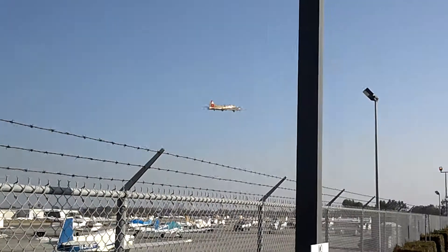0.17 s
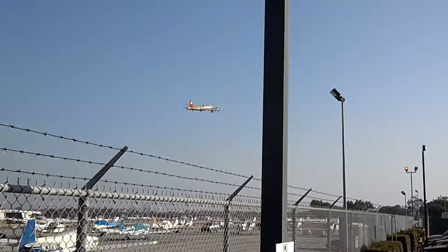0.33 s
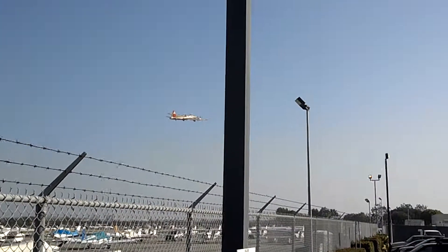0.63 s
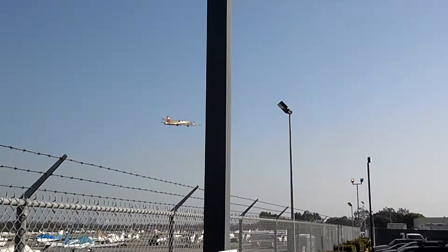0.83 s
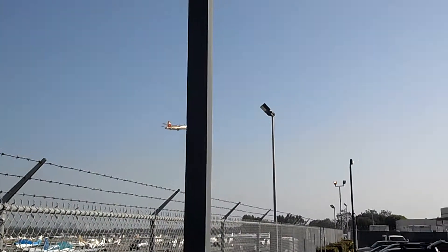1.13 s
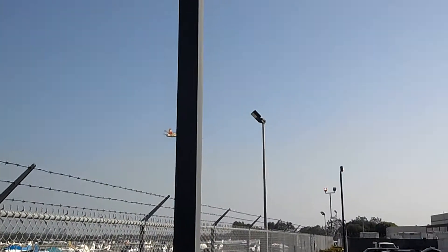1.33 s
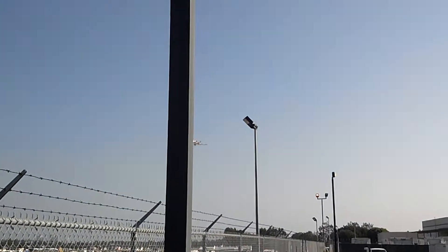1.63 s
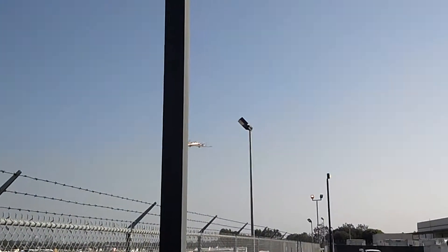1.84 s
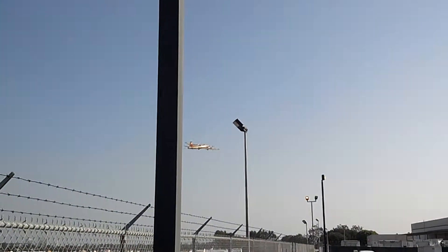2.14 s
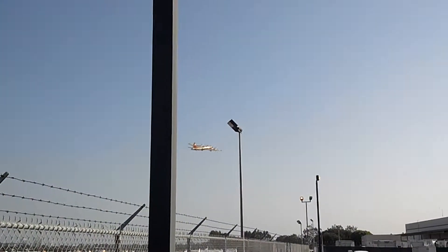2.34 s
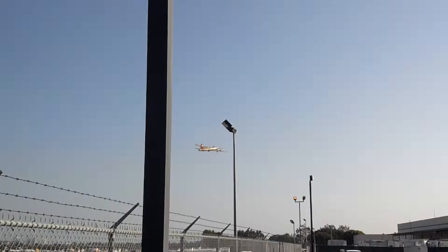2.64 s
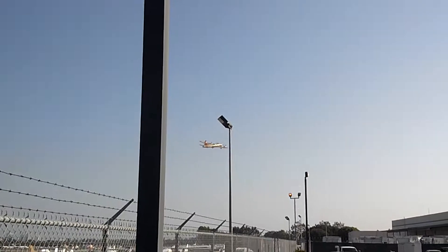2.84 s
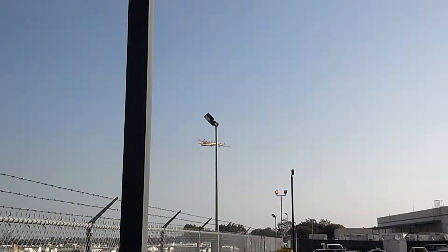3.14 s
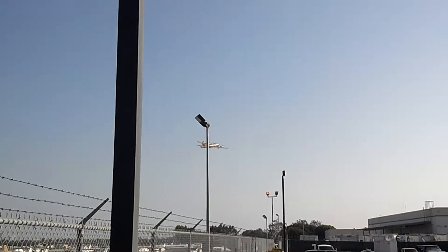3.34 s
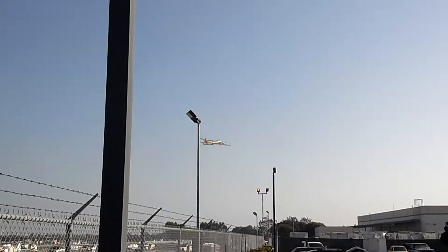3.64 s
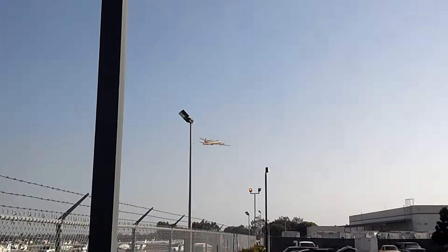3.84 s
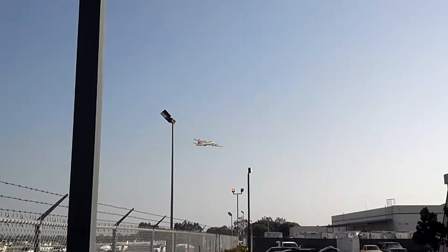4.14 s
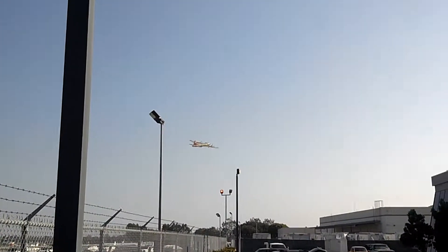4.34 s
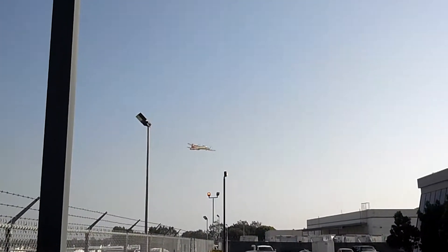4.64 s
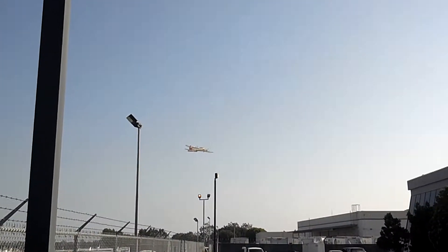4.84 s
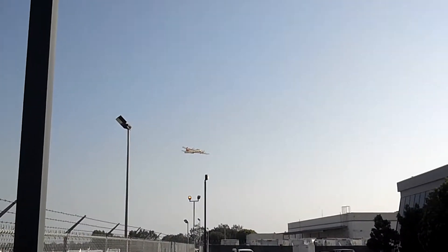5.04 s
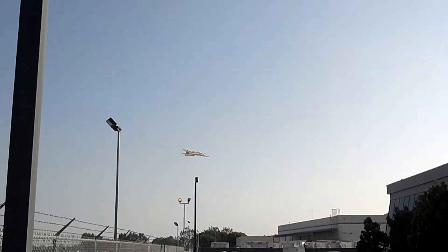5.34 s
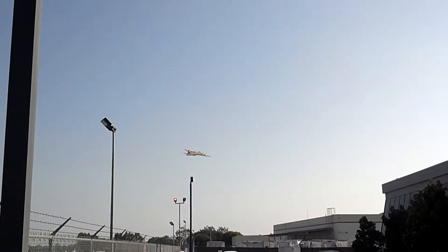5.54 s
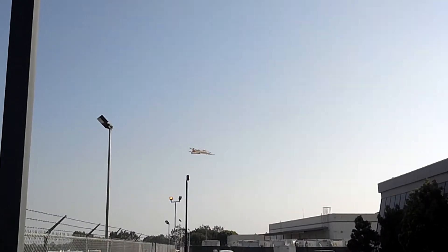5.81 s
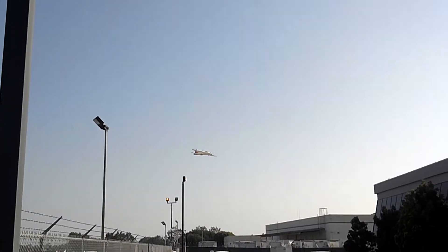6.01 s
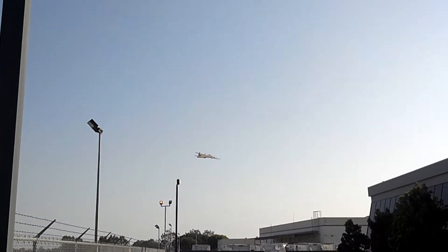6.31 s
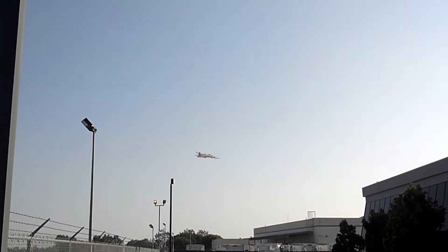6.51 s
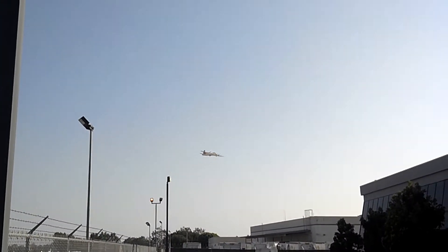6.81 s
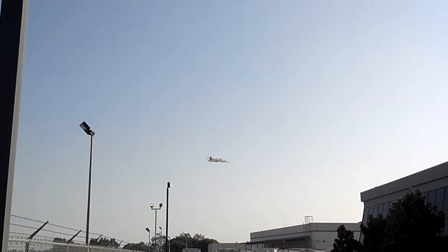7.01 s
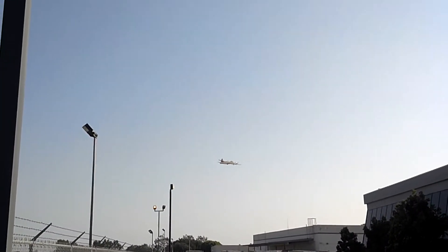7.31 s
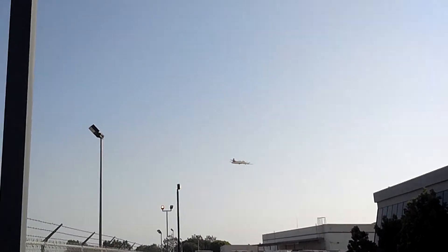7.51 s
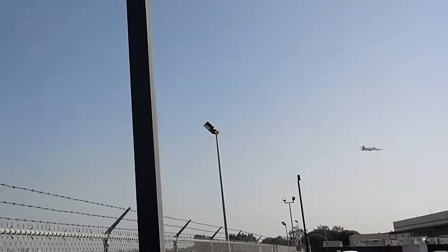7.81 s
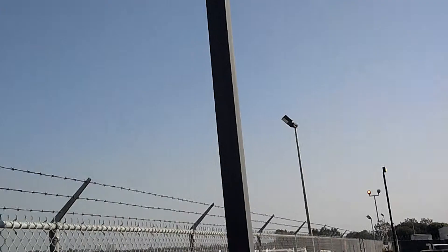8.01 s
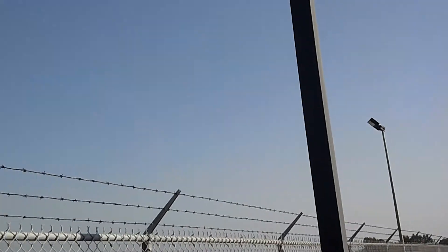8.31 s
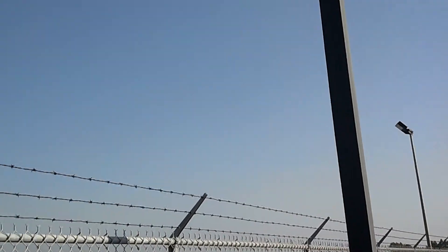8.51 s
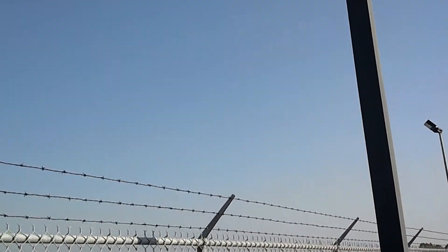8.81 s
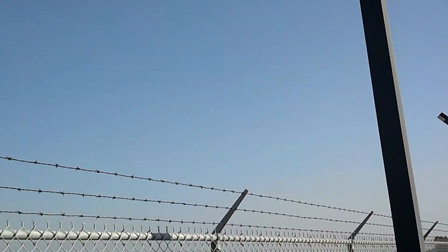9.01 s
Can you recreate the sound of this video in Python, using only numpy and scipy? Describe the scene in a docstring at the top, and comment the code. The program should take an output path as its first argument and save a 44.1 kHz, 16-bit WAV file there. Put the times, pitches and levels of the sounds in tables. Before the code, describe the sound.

A large four-engined piston aircraft, already airborne at some distance, climbs away past an airfield fence for about nine seconds. From the start its low drone and grainy mid-range roar are continuous, pulsed by rapid uneven firing, with tones beating slowly. Hard exhaust barks stand out around 0.4-0.5, 1.6-1.9, 2.5 and 3.5-3.8 seconds, with another near 5.4. The rasp shifts in colour and the treble gradually dulls. A gentle breeze rumbles in both channels of a hand-held camera microphone. A sharp wind thump comes at 6.0, then dry ticks and faint rubbing at the grip from 6.2 to 7.4. Strong buffets from 7.4 to 7.8 briefly pull the level down. Near 7.8 the camera swings aside and the roar changes colour; two more barks come near 8.3, a gust near 8.7, and the drone continues to the end over faint hiss.

```python
"""A four-engined piston aircraft climbs away past an airfield fence, heard by a hand-held camera in a breeze.
From the start, crank and propeller tones drone inside noise pulsed by nine-cylinder firing; hard barks ring
as damped sines, moving air makes the colour drift, and noise eddies buffet two close capsules over a faint hiss.
Ticks and rubbing at the grip gather after 6 s; the hardest gusts, at 6 s and from 7.4 s, pull the gain down.
Near 7.8 s the camera swings aside and the colour shifts; a delayed difference of capsules forms each channel."""
import sys
import numpy as np
from scipy import signal
from scipy.fft import rfft, irfft
from scipy.io import wavfile
from scipy.ndimage import uniform_filter1d

SR = 44100
rng = np.random.default_rng(int(sys.argv[2]) if len(sys.argv) > 2 else 0)


def store_wav(level_fs):
    """Save 16-bit WAV to argv[1]."""
    pcm = np.round(np.clip(np.atleast_2d(level_fs), -1, 1) * 32767)
    wavfile.write(sys.argv[1], SR, pcm.T.astype(np.int16))


N = 403956
T = np.arange(N) / SR  # time [s]

# All levels are relative: later stages add their own gains.
# Capsule self-noise spectrum above 500 Hz: f/Hz, level/dB
HISS_SPECTRUM = [(3000, 10), (8000, -6), (11000, -7.5), (15500, 0.5)]
HISS_DB = -72
# Breeze strength: t/s, level/dB
BREEZE = [(0, -39), (1.4, -32), (2.7, -41.5), (3.5, -32), (4.6, -42.5), (5.5, -35), (6.7, -30.5),
          (7.4, -26), (7.95, -33), (8.35, -28), (8.5, -32), (8.9, -25.5), (9.16, -29)]
# Strongest gusts: t/s, length/s, level/dB, side (1 left capsule, -1 right), top of the rumble f/Hz
GUSTS = [(.065, 0.049, -34, -0.32, 330), (1.58, 0.1, -29, .11, 260), (2.05, 0.19, -26, 0.18, 274),
         (2.298, 0.057, -29.5, -.2, 220), (5.6, 0.059, -33.5, .47, 250), (5.83, 0.17, -29.5, -0.19, 220),
         (6.002, .014, -12.5, -1, 170), (6.53, .046, -26, 1, 200), (6.76, 0.088, -25, .5, 230),
         (7.189, 0.092, -23.5, -.44, 280), (7.398, 0.055, -17.5, -0.42, 332),
         (7.436, 0.073, -13, 0.32, 546), (7.626, 0.011, -21.5, -0.87, 620),
         (7.668, 0.045, -16.5, -1.2, 376), (7.735, .04, -15, -1, 420), (7.822, .03, -18.5, -0.92, 400),
         (8.29, 0.048, -32, -.25, 259), (8.36, 0.035, -26, 0.7, 283), (8.44, 0.11, -26, 0.58, 170),
         (8.688, .028, -32, -0.37, 430), (8.736, 0.029, -17.5, -0.67, 430)]
# Spectrum of wind eddies at a capsule: f/Hz, level/dB
BUFFET = [(25, -29.5), (60, -5.5), (110, 7), (170, -1), (300, -3), (700, -14.5), (1500, -36.5), (4000, -51)]
BUILD_DB_PER_S = 24.5  # a gust builds up and breaks off
# Ticks on the camera body: t/s, level/dB, colour f/Hz
TICKS = [(1.2569, -55, 9000), (6.255, -47, 15500), (6.302, -37, 14560), (6.3995, -32, 13500),
         (6.414, -25.5, 14000), (6.4925, -36.5, 5500), (6.5838, -53, 14740), (6.7125, -42, 15200),
         (6.784, -31.5, 13500), (7.0716, -51, 12500), (7.363, -43, 13420)]
# Rubbing at the grip: t/s, length/s, level/dB
RUSTLES = [(0.06, 0.081, -59), (0.185, 0.15, -50), (0.69, 0.11, -66), (5.598, 1.65, -61),
           (6.23, 0.072, -52), (6.29, .02, -45), (6.393, 0.045, -45), (8.576, 0.25, -56)]
# Spectrum of the rubbing: f/Hz, level/dB
RUB_SPECTRUM = [(2500, -31), (6000, -2.5), (10000, -12), (12000, -5.5), (15500, 1.5)]
# Hardest exhaust barks: t/s, level/dB, pipe f/Hz
POPS = [(.423, -15.5, 480), (.447, -10, 453), (0.512, -15.5, 1180), (0.537, -6, 473), (1.628, -18, 970),
        (1.627, -12, 520), (1.712, -10, 467), (1.72, -14, 1030), (1.757, -12.5, 960), (1.776, -15, 1000),
        (1.777, -12, 1390), (1.81, -12, 960), (1.861, -12.5, 947), (2.473, -18, 910), (2.556, -14.5, 957),
        (2.588, -11.5, 1283), (3.543, -17, 1340), (3.656, -16, 1265), (3.75, -19, 1390), (5.383, -16, 1326),
        (8.29, -13, 393), (8.336, -18, 1460)]
# Engine cycle rate as heard, two crank turns a cycle: t/s, f/Hz
CYCLE_RATE = [(0, 17.45), (1.5, 17.36), (3.5, 17.27), (4.5, 17.22), (6, 17.3), (9.16, 17.29)]
# Engines, near ones leading: share off the common speed, level/dB
ENGINES = [(0, -2.5), (-.0025, -8), (.0012, -9), (.004, -6.5)]
# Crank tones: multiple of the cycle rate (nine is the firing rate), level/dB
ORDERS_DB = [(4, -28), (5, -19.5), (6, -29.5), (8, -29.5), (11, -27.5), (13, -34), (15, -27.5), (16, -30),
             (17, -24.5), (18, -27), (21, -29.5), (23, -24), (24, -26), (25, -28.5), (26, -31), (28, -33),
             (30, -28), (31, -32.5), (33, -31.5)]
# Multiples of the cycle rate carried by the strongest tones
LEADING_ORDERS = [7, 9, 14, 22]
# Strongest tones as the engines beat: t/s, level/dB of multiples 7, 9, 14 and 22
BEATING = [(0, -28, -29, -14.5, -25), (.23, -30, -36, -28, -26), (.45, -46, -16, -40, -20),
           (.95, -12, -13.5, -34, -15.5), (1.5, -17, -18, -10.5, -16.5), (2.05, -24, -14, -30, -23),
           (2.37, -18, -19.5, -32, -22), (2.6, -28, -13, -22, -20.5), (3.1, -26, -16.5, -27, -20),
           (3.6, -25.5, -19.5, -34, -27.5), (4.18, -16.5, -13.5, -26, -27), (4.37, -22, -29, -31, -24),
           (4.5, -18, -14.5, -29, -20.5), (4.9, -26, -21.5, -26.5, -18), (5.4, -27.5, -20, -23.5, -29),
           (5.69, -34, -37, -23.5, -24), (5.9, -25, -15, -23, -23.5), (6.2, -21, -26, -26, -19.5),
           (6.55, -26, -19.5, -24, -19), (7.001, -30, -28, -23, -19.5), (7.299, -40, -16.5, -19, -30.5),
           (8, -28, -36, -23, -23), (8.401, -29, -20, -19, -30.5), (9.16, -30.5, -23, -25, -24.5)]
BLADE_ORDER = 27 / 8  # blade passings per engine cycle
# Blade-passing tone and its overtones: level/dB
BLADES_DB = [-22.5, -30.5, -38, -43, -32, -28]
# Exhaust puffs in firing order: level/dB
CYLINDERS_DB = [-1, -2.5, -10, -8, 2.5, 0.5, -3, -15.5, -13]
# Flyby: t/s, level/dB, centre of the rasp f/Hz, rasp over the roar level/dB, treble over the roar level/dB
FLYBY = [(0, -25, 1270, 1, 2), (.09, -25, 1240, 2.5, 2), (.17, -29, 1350, 3.5, 2),
         (.55, -26, 1140, 4.5, 6.5), (1.15, -29.5, 1096, 6.5, 3.5), (1.45, -29, 1010, 1.5, 3),
         (1.8, -27.5, 1100, 9, 4.5), (2.2, -29, 1000, 3.5, 1), (2.57, -26.5, 1200, 5, -2),
         (3.2, -26, 1090, 4.5, -1), (3.72, -26, 1265, 6, 3.5), (4.1, -28, 1310, 3, 3),
         (4.5, -26.5, 1310, 3, 3), (4.85, -25.5, 1550, 5.5, 5), (5.1, -26.5, 1400, 3.5, 3.5),
         (5.4, -27, 1330, 1.5, -2), (5.9, -27, 1310, 4, -2.5), (6.45, -26, 1370, -4, -4),
         (6.7, -28.5, 1350, 1, -2.5), (7, -27.5, 1350, 2, -2.5), (7.25, -26, 1480, 4.5, 2),
         (7.45, -27, 1560, 6, -0.5), (7.7, -26.5, 1380, 2, -6), (7.92, -26.5, 1350, -0.5, 0),
         (8.3, -27, 1400, 0, -3.5), (8.6, -26.5, 1300, -2, -7.5), (8.8, -27.5, 1220, -4, -8.5),
         (9.16, -23, 1380, -3, -12.5)]
RASP_OCTAVES, TREBLE_HZ = 0.32, 2480  # width of the rasp; where the treble begins
# Spectrum of the roar: f/Hz, level/dB
ROAR = [(25, -27.5), (60, -20), (140, -1.5), (230, -9), (390, -13.5), (620, -19.5), (1300, -26.5),
        (2000, -27), (3500, -37.5), (5500, -52.5), (8000, -74.5), (16000, -96)]
# Exhaust pipe resonances: f/Hz, width/Hz, level/dB
PIPES = [(364, 54, 2.5), (580, 21, 1), (888, 112, 3.5), (1335, 112, 5.5), (1605, 45, 4), (1902, 24, 3)]
# Colour change in flying away: f/Hz, slope/(dB per s)
RECEDING = [(130, 0.27), (290, 0.14), (550, -0.43), (970, 0), (1340, 0.33), (1900, 0.5), (4000, 0),
            (7500, -1.9)]
SWING_S, SWING_LENGTH_S = 7.76, 0.76  # middle and length of the camera's swing off the aircraft
# Colour change once turned aside: f/Hz, level/dB
SWUNG = [(130, -6), (290, 6), (550, -0.5), (970, 2.5), (1900, 3), (4000, 6.5)]
# How far the low drone outweighs the low-mid roar: t/s, level/dB
DRONE_TILT = [(0, -19.5), (.3, -3.5), (.6, 2.5), (1.15, -4), (1.8, -5), (2.3, -7.5), (2.7, -7), (4.0, 1),
              (4.35, -4.5), (4.6, -8), (5.9, 5), (6.6, 4.5), (9.16, -6)]
# Weight of that tilt across the spectrum: f/Hz, share
TILT_SHARE = [(60, 0.07), (140, 0.15), (290, -0.034), (560, -0.26), (850, 0.041)]
BODY_HZ, BODY_OCTAVES = 537, 0.16  # centre and width of the low-mid band
# Low-mid band: t/s, level/dB
BODY = [(0, -2.5), (.3, 6.5), (.8, 3.5), (1.1, 1.5), (1.5, 6), (2.1, 7.5), (2.5, 0.5), (2.9, -2.5),
        (3.2, 4), (3.65, -4), (4.5, -4.5), (5.2, -4.5), (6.4, 1), (7.1, 4), (8, 2), (9.16, -2)]
# Likeness of the roar at the two capsules: f/Hz, correlation
ALIKE = [(100, 0.98), (350, 0.96), (700, 0.93), (1200, 0.69), (2500, 0.51), (4000, 0.73), (7000, 0.77)]
# Phase by which the left capsule leads: f/Hz, phase/rad
LEAD = [(80, 0), (200, -0.13), (330, 0.14), (500, 0.33), (700, -0.37), (1000, 0.84), (2000, 2), (3500, 5),
        (5000, 7.5), (7000, 18)]
# Left capsule over the right: f/Hz, level/dB
LEFT_DB = [(100, 1.5), (300, 2), (500, 5), (800, 3), (1200, -5.5), (2000, 5), (3500, 4), (6000, 6.5)]
CROSS_DELAY, EDGE_HZ = 16, 15800  # delay between opposed capsules [samples]; upper band edge
LIMIT_DB, LIMIT_SHARE, SENSE_S, RECOVER_DB_PER_S = -20, 0.65, 0.01, 7.5  # gain control


def gain_of(db):
    """Logarithmic level: decibels to amplitude ratio."""
    return 10 ** (np.asarray(db) / 20)


def evened(x):
    """Normalisation: scales to unit rms."""
    return x / np.sqrt(np.mean(x ** 2) + 1e-20)


def read(points, hz):
    """Interpolation on a logarithmic frequency axis."""
    f, value = np.transpose(points)
    return np.interp(np.log(hz + 1), np.log(f + 1), value)


def course(points, t):
    """Linear interpolation in time."""
    return np.interp(t, *np.transpose(points))


def spectra(x):
    """Short-time Fourier analysis: frequencies, times and spectra."""
    return signal.stft(x, SR, nperseg=1024, noverlap=768)


def sound(z):
    """Fourier synthesis by overlap-add of short-time spectra."""
    return signal.istft(z, SR, nperseg=1024, noverlap=768)[1][..., :N]


def coloured(points, channels):
    """Spectral shaping: white noise weighted by frequency, at unit rms."""
    gain = gain_of(read(points, np.fft.rfftfreq(N, 1 / SR)))
    return evened(irfft(rfft(rng.standard_normal((channels, N))) * gain, N))


def drift(t, hz):
    """Slow fluctuation at unit rms: random-phase sines up to hz, the slower the stronger."""
    rates = hz * np.geomspace(.05, 1, 16)
    return evened(sum(np.sin(2 * np.pi * (f * t + rng.random())) / np.sqrt(f) for f in rates))


def smoothed(shape, bins, frames):
    """Random field correlated over neighbouring frequencies and times, at unit rms."""
    across = uniform_filter1d(rng.standard_normal(shape), bins, axis=0)
    return evened(uniform_filter1d(across, frames, axis=1))


def octave_bump(hz, centre, octaves):
    """Resonance bell: a Gaussian in log frequency."""
    return np.exp(-.5 * (np.log2((hz + 1) / centre) / octaves) ** 2)


def add(mix, s, part):
    """Superposition: mixes a short sound in at time s."""
    place = mix[:, round(s * SR):][:, :part.shape[1]]
    place += part[:, :place.shape[1]]


def excerpt(x, s, length):
    """Windowing in time: the stretch of x that starts at s."""
    return x[:, round(s * SR):][:, :round(length * SR)]


def hiss(rise_db_per_s=1.13):
    """Capsule self-noise: a faint, independent treble floor that creeps up with time."""
    return coloured([(500, -55.5)] + HISS_SPECTRUM, channels=2) * gain_of(HISS_DB + rise_db_per_s * T)


def wind(lumpy_db=7.0, gust_lumpy_db=3.0, lump_s=0.012):
    """Turbulent pressure: eddies unrelated left and right form a lumpy breeze and separate gusts."""
    lumps = uniform_filter1d(rng.standard_normal((2, N)), round(lump_s * SR))
    eddies = coloured(BUFFET, channels=2) * evened(gain_of(gust_lumpy_db * evened(lumps)))
    breeze = coloured(BUFFET, channels=2) * evened(gain_of(lumpy_db * evened(lumps[::-1])))
    out = signal.lfilter(*signal.butter(2, 260, fs=SR), breeze) * gain_of(course(BREEZE, T))
    for s, length, db, side, reach_hz in GUSTS:
        band = signal.butter(2, [0.31 * reach_hz, reach_hz], "band", fs=SR)
        gust = signal.lfilter(*band, excerpt(eddies, s, length))
        size = gust.shape[1]
        gust = gust * signal.windows.tukey(size, .25) * gain_of(BUILD_DB_PER_S * T[:size])
        gust = np.array([evened(channel) for channel in gust])
        side = np.clip(side, -1, 1)
        balance = np.sqrt([[1 + side], [1 - side]])
        add(out, s, gain_of(db) * balance * gust)
    return out


def handling(tick_s=0.00092, grain_db=2.0, tick_db=4, body=0.36, far=0.44):
    """Structure-borne sound: ticks and grainy rubbing carried through the case to both capsules."""
    out, t = np.zeros((2, N)), np.arange(600) / SR
    grain = evened(gain_of(grain_db * evened(uniform_filter1d(rng.standard_normal(N), 130))))
    rub = coloured(RUB_SPECTRUM, channels=2) * grain
    broad = signal.butter(2, 2500, "high", fs=SR)
    for (s, db, hz), burst in zip(TICKS, rng.standard_normal((len(TICKS), len(t)))):
        band = signal.butter(2, [0.9 * hz, min(1.5 * hz, .45 * SR)], "band", fs=SR)
        snap = np.outer([1, far], burst * np.exp(-t / tick_s))  # nearer the left capsule
        # a broad snap under the ring
        tick = signal.lfilter(*band, snap) + body * signal.lfilter(*broad, snap)
        add(out, s, gain_of(db + tick_db) * tick / abs(tick).max())
    for s, length, db in RUSTLES:
        rustle = excerpt(rub, s, length)
        add(out, s, gain_of(db) * rustle * signal.windows.tukey(rustle.shape[1], .95))
    return out


def pops(t60=0.048, rise_s=.0008, left_db=-4.5, right_db=-8.5):
    """Damped resonance: single hard firings each ring one exhaust pipe briefly."""
    out, t = np.zeros((2, N)), np.arange(2000) / SR
    envelope = gain_of(-60 * t / t60) * np.minimum(t / rise_s, 1)
    balance_db = np.array([[left_db], [right_db]])
    for (s, db, hz), turn in zip(POPS, rng.random(len(POPS))):
        late = np.array([[0], [read(LEAD, hz)]])
        ring = np.sin(2 * np.pi * (hz * t + turn) - late) * envelope
        add(out, s, gain_of(db + balance_db) * ring)
    return out


def order_tones(cycles, waver, near_db, tone_db=3, waver_db=4.5):
    """Harmonic radiation of one engine: sines at multiples of its cycle, each swelling in its own time."""
    tones = np.zeros(len(cycles))
    blades = [(BLADE_ORDER * (k + 1), db) for k, db in enumerate(BLADES_DB)]
    for multiple, db in ORDERS_DB + blades:
        swell_db = waver_db * np.roll(waver, rng.integers(len(cycles)))
        gain = gain_of(db + near_db + tone_db + swell_db)
        tones += gain * np.sin(2 * np.pi * (multiple * cycles + rng.random()))
    return tones


def puff_power(cycles, near_db, puff=0.64, uneven_db=3.0):
    """Pulsed efflux of one engine: each uneven firing decays over puff firing intervals; its power."""
    firings = len(CYLINDERS_DB) * cycles
    number = firings.astype(int)
    strength = gain_of(np.add(CYLINDERS_DB, near_db))[number % len(CYLINDERS_DB)]
    strength *= gain_of(uneven_db * np.clip(rng.standard_normal(2000), -3, 2))[number % 2000]
    return (strength * np.exp(-(firings % 1) / puff)) ** 2


def beating_tones(slow, stray=.005, flutter_db=3.0, slip=0.091):
    """Interference: the strongest tones swell and sink, with wandering phase, as the engines beat."""
    speed = course(CYCLE_RATE, slow) * (1 + stray * drift(slow, 4))
    cycles = np.cumsum(speed) * 16 / SR
    tones = np.zeros(len(slow))
    s, *beats = np.transpose(BEATING)
    for multiple, db in zip(LEADING_ORDERS, beats):
        gain = gain_of(np.interp(slow, s, db) + flutter_db * drift(slow, 12))
        tones += gain * np.sin(2 * np.pi * multiple * cycles + slip * multiple * drift(slow, 8))
    return tones


def engines(fade_db_per_s=1.0, wobble=0.003):
    """Superposition of four detuned engines: their tones, and the amplitude of their summed puff power."""
    slow = T[::16]  # the tones are low, so a sixteenth of the sample rate carries them
    waver = drift(slow, 14)
    tones, power = np.zeros(len(slow)), np.zeros(N)
    for detune, near_db in ENGINES:
        speed = course(CYCLE_RATE, slow) * (1 + detune + wobble * drift(slow, 3))
        cycles = np.cumsum(speed) * 16 / SR + rng.random()
        tones += order_tones(cycles, waver, near_db)
        power += puff_power(np.interp(T, slow, cycles), near_db)
    tones *= gain_of(-fade_db_per_s * slow)
    tones += beating_tones(slow)
    return signal.resample_poly(tones, 16, 1)[:N], evened(np.sqrt(power))


def turbulence(shape, patchy_db=1.5, fleck_db=2.0, burst_db=0.69):
    """Scattering: turbulence along the path focuses and scatters the roar, as gains in time and frequency."""
    patches = smoothed(shape, bins=4, frames=30)
    flecks = smoothed(shape, bins=2, frames=14)
    bursts = smoothed(shape, bins=14, frames=5)
    return gain_of(patchy_db * patches + fleck_db * flecks + burst_db * bursts)


def path_colour(hz, t, swung, rasp_hz, rasp_db, treble_db, focus=0.093):
    """Source-filter principle: the roar's spectrum, pipe resonances and drifting path colour add in dB."""
    colour = rasp_db * octave_bump(hz[:, None], rasp_hz, RASP_OCTAVES)
    colour += np.outer(1 / (1 + (TREBLE_HZ / (hz + 1)) ** 4), treble_db)
    colour += np.outer(read(RECEDING, hz), t - t.mean())
    colour += np.outer(read(SWUNG, hz), swung)
    colour += np.outer(read(TILT_SHARE, hz), course(DRONE_TILT, t))
    colour += np.outer(octave_bump(hz, BODY_HZ, BODY_OCTAVES), course(BODY, t))
    pipes = sum(db * np.exp(-.5 * ((hz - f) / width) ** 2) for f, width, db in PIPES)
    swell = np.clip(1 + focus * colour, .2, 2)  # a favoured register shows its pipes more sharply
    return read(ROAR, hz)[:, None] + pipes[:, None] * swell + colour


def aircraft(level_db=24, puffy_hz=450, steady=0.71, turn=0.035, swing_left_db=-1.0):
    """Partial coherence: roar and tones, coloured by the air, reach two capsules with phase and level offsets."""
    tones, puffs = engines()
    steady_noise = rng.standard_normal((2, N))
    puffed_noise = puffs * rng.standard_normal((2, N))
    hz, t, (drone, wash, wash2, bark, bark2) = spectra(np.vstack([tones, steady_noise, puffed_noise]))
    share = (1 - steady) * (hz ** 2 / (hz ** 2 + puffy_hz ** 2))[:, None]  # puffs are heard high up
    eddies = turbulence(drone.shape)
    direct = drone + eddies * (np.sqrt(1 - share) * wash + np.sqrt(share) * bark)
    scattered = eddies * (np.sqrt(1 - share) * wash2 + np.sqrt(share) * bark2)

    s, loud_db, *columns = np.transpose(FLYBY)
    rasp_hz, rasp_db, treble_db = (np.interp(t, s, column) for column in columns)
    swung = np.clip((t - SWING_S) / SWING_LENGTH_S + .5, 0, 1)
    db = path_colour(hz, t, swung, rasp_hz, rasp_db, treble_db)

    alike = read(ALIKE, hz)[:, None]
    late = np.exp(-1j * read(LEAD, hz)[:, None] * (1 - turn * t))  # the bearing swings toward the front
    right = alike * late * direct + np.sqrt(1 - alike ** 2) * scattered
    tilt = gain_of((read(LEFT_DB, hz)[:, None] + swing_left_db * swung) / 2)
    pair = sound(gain_of(db) * np.array([direct * tilt, right / tilt]))
    return pair * gain_of(level_db + np.interp(T, s, loud_db))


def scene():
    """Superposition of pressures at the left and right capsules."""
    return aircraft() + pops() + wind() + handling() + hiss()


def record(dry, ceiling=.44):
    """Pressure-gradient directivity by delayed difference, then gain control, soft limiting and a low-pass."""
    aimed = dry - np.pad(dry[::-1], ((0, 0), (CROSS_DELAY, 0)))[:, :N]
    keep = np.exp(-1 / (SENSE_S * SR))
    power = signal.lfilter([1 - keep], [1, -keep], aimed ** 2).max(0)  # louder channel rules both
    power_db = 10 * np.log10(power + 1e-12)
    # a running maximum on a rising slope: the cut deepens at once and recovers steadily
    slope_db = RECOVER_DB_PER_S * T
    cut_db = LIMIT_SHARE * np.maximum(power_db - LIMIT_DB, 0) + slope_db
    aimed = aimed / gain_of(np.maximum.accumulate(cut_db) - slope_db)
    aimed = aimed / (1 + (aimed / ceiling) ** 4) ** .25
    low_pass = signal.firwin(511, EDGE_HZ, window=("kaiser", 9), fs=SR)
    return signal.oaconvolve(aimed, low_pass[None], "same")


dry = scene()
out = record(dry)
store_wav(out)
```